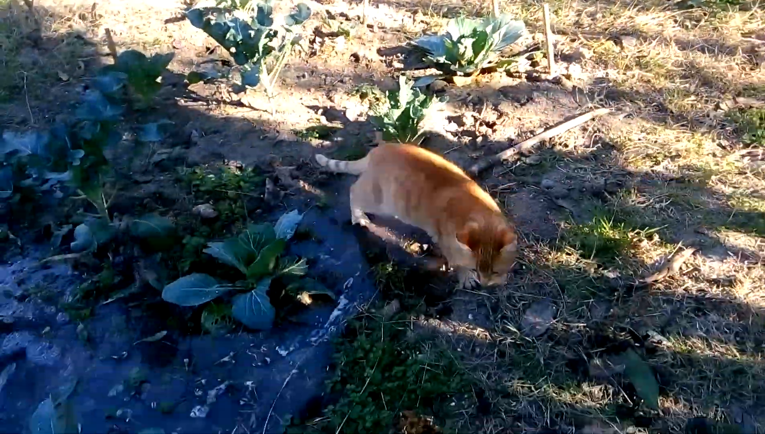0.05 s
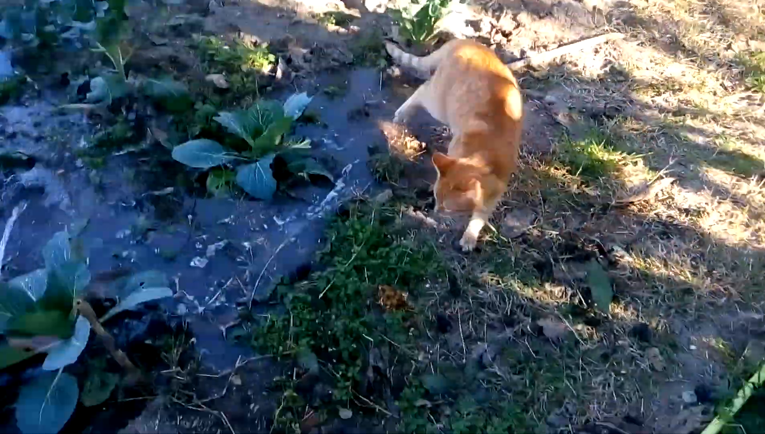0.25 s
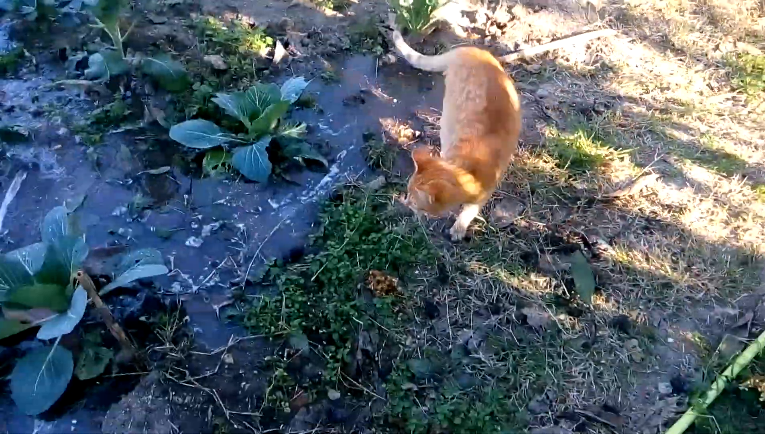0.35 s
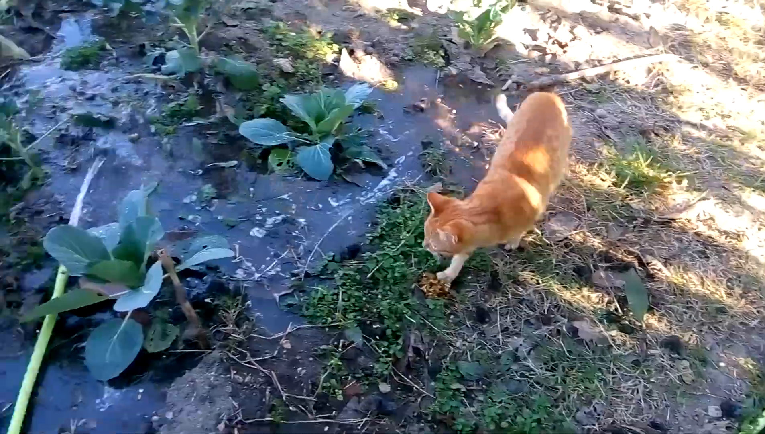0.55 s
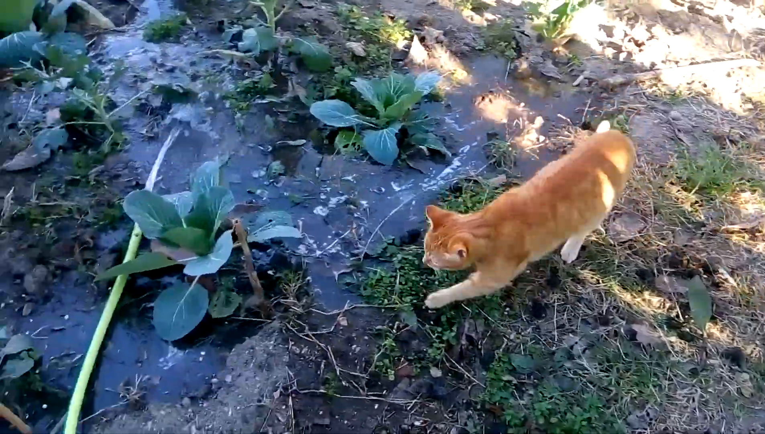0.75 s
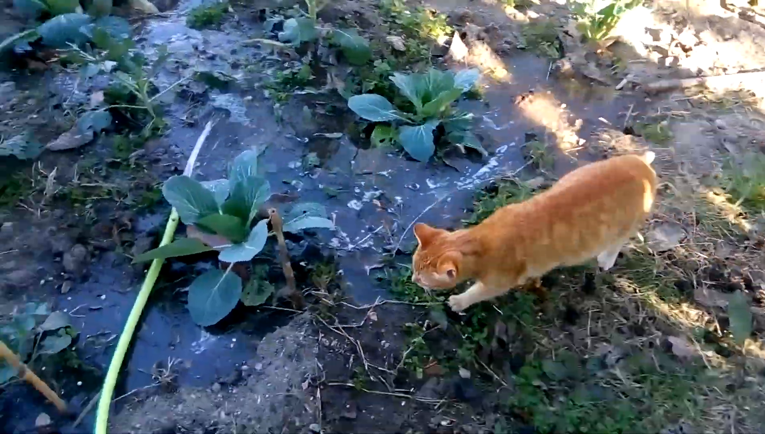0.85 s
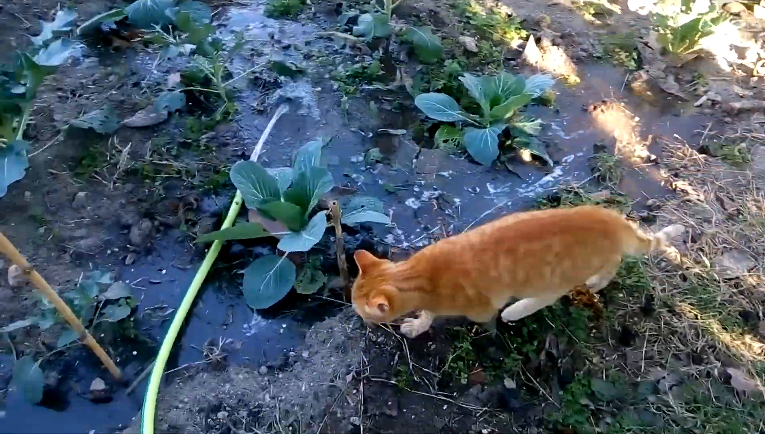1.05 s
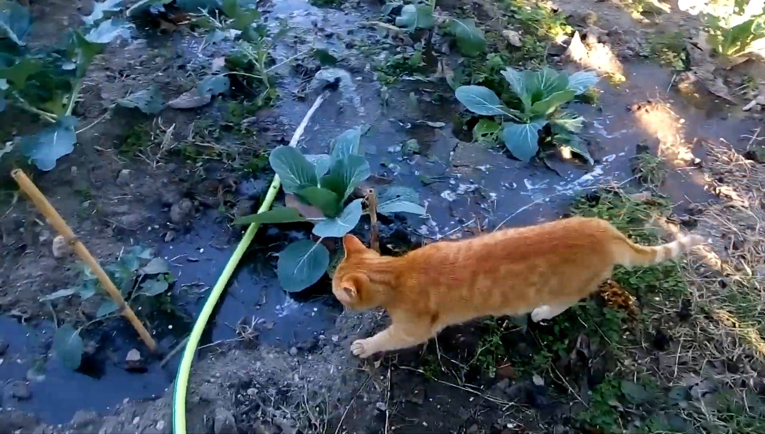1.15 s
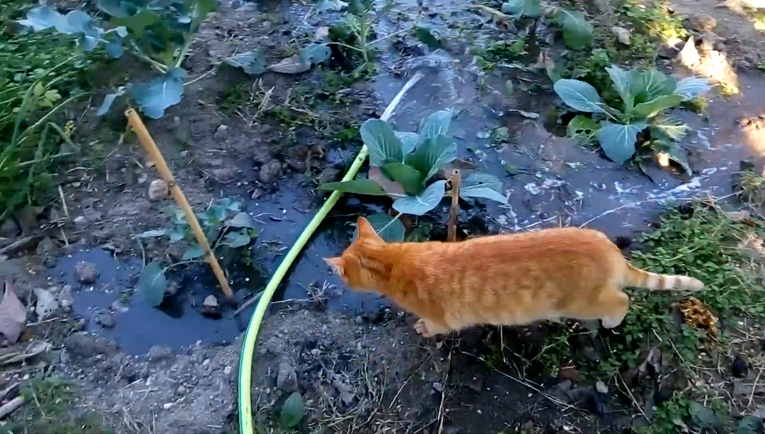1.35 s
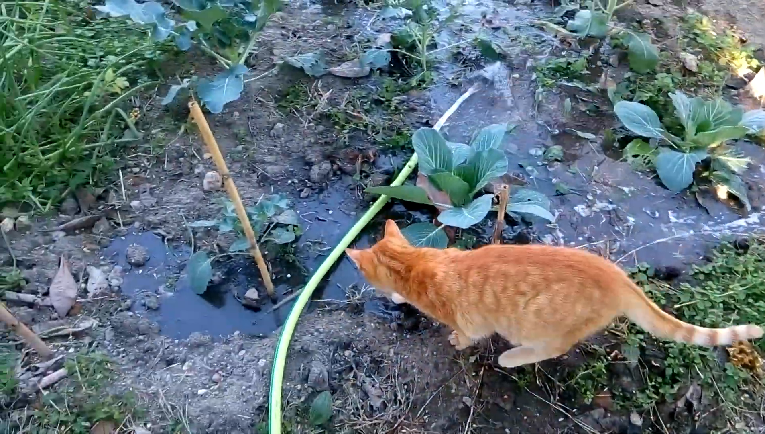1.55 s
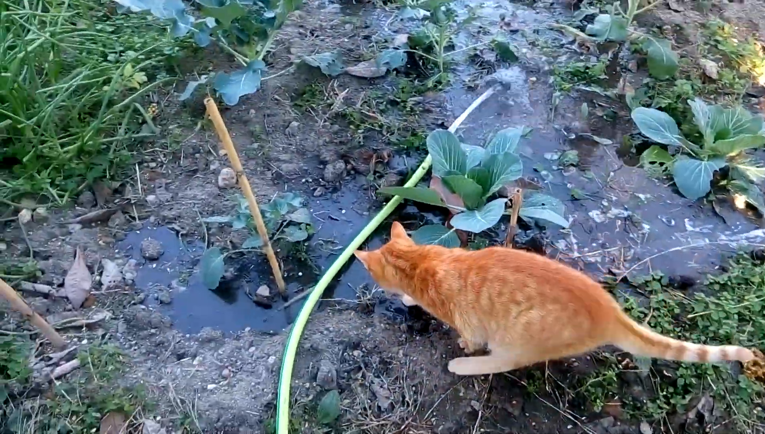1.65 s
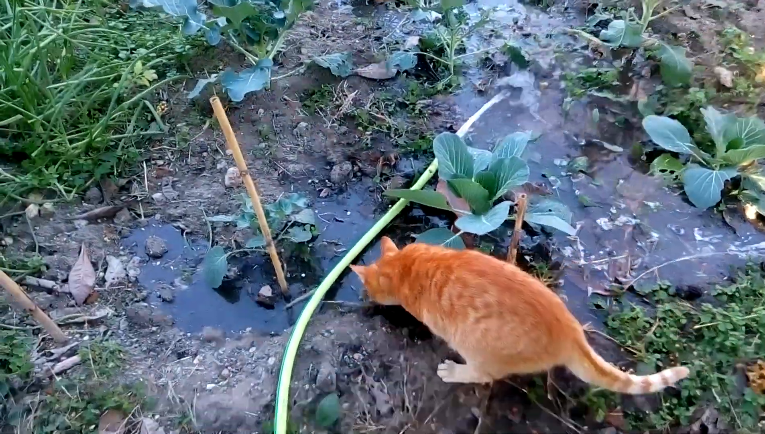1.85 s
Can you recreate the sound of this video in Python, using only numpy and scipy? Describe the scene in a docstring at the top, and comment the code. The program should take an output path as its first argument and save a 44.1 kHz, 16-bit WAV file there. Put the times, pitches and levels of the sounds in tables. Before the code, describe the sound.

Microphone handling knocks and scratchy rubbing, then soft wind gusts over faint running water.

```python
"""A watered garden bed, heard through the two microphone ports of a hand-held camera.
Running water hisses steadily, with two lone drops. A faint whistle rises and twigs tap underfoot.
Up front, fingers shift on the case: skin snaps at the left port, hollow knocks ring the half-covered
right one, and a crackling stick-slip rub dies away. Then light gusts buffet each port in turn."""
import sys
import numpy as np
from scipy import signal
from scipy.fft import rfft, irfft
from scipy.io import wavfile
from scipy.ndimage import uniform_filter1d

SR = 44100
rng = np.random.default_rng(int(sys.argv[2]) if len(sys.argv) > 2 else 0)


def put_to_file(sound):
    """Save the sound as 16-bit audio at rate SR, in the file named by the first command-line argument."""
    columns = np.atleast_2d(sound).T  # one column per channel
    safe = np.clip(columns, -1, 1)
    whole_steps = np.round(safe * 32767)
    wavfile.write(sys.argv[1], SR, whole_steps.astype(np.int16))


N = 83790
TIME_S = np.arange(N) / SR


def undb(db):
    """Decibels to gain."""
    return 10 ** (np.asarray(db) / 20)


def unit(x):
    """Scale to rms 1."""
    return x / np.sqrt(np.mean(x ** 2))


def decay(age_s, t60_s):
    """Exponential fade that falls 60 dB in t60_s."""
    return np.exp(-np.log(1000) * age_s / t60_s)


def colour(x, *curves, size=4096):
    """Minimum-phase EQ through (freq_hz, gain_db) points; several curves stack."""
    half = size // 2
    log_hz = np.log(np.maximum(np.arange(half + 1) * SR / size, 1))
    db = sum(np.interp(log_hz, np.log(hz), gain_db) for hz, gain_db in map(np.transpose, curves))
    cepstrum = irfft(np.log(undb(db)))
    cepstrum[1:half] *= 2
    cepstrum[half + 1:] = 0
    impulse_response = irfft(np.exp(rfft(cepstrum)))
    return signal.oaconvolve(x, impulse_response)[:len(x)]


def wander(per_s):
    """Smooth random drift, rms 1."""
    hold = int(SR / per_s)
    steps = np.repeat(rng.standard_normal(N // hold + 1), hold)
    return unit(uniform_filter1d(steps, hold)[:N])


def flicker(x, depth_db, per_s):
    """Each treble octave wavers in level on its own; the lows waver as one band."""
    spectrum = rfft(x)
    octave = np.round(np.log2(np.maximum(np.arange(len(spectrum)) * SR / N, 1000)))
    return sum(irfft(spectrum * (octave == k), N) * undb(depth_db * wander(per_s))
               for k in np.unique(octave))


def grains(per_s, spread_db):
    """A crackle of random impulses of uneven size, rms 1."""
    hit = rng.random(N) < per_s / SR
    size = undb(spread_db * np.minimum(rng.exponential(size=N), 4))
    return unit(hit * size * rng.choice([-1, 1], N))


def rings(rows):
    """Damped vibrations that leave no net pressure: start_s, peak_db, pitch_hz, t60_s."""
    out = np.zeros(N)
    for start, db, hz, t60 in rows:
        age = np.arange(int(2 * t60 * SR) + 2) / SR
        phase = 2 * np.pi * hz * age
        wave = np.sin(phase) * decay(age, t60) * (1 - np.exp(-phase))
        push = np.diff(wave, prepend=0)
        first = int(start * SR)
        out[first:first + len(age)] += (undb(db) * push / np.abs(push).max())[:N - first]
    return out


# The tone of each port, on the water, the rub and the handling tail: freq_hz, gain_db
LEFT_PORT_EQ = [(1100, 4), (1500, 2.5), (2700, 2), (4500, -4.5), (7500, -2), (10000, 0.8), (12500, 3),
                (14000, -7.5), (15500, -42)]
RIGHT_PORT_EQ = [(1100, 4.5), (1600, 3.1), (2450, 4), (3200, -13), (3700, -14), (4500, -5.5), (6500, -8),
                 (7800, -10.5), (9200, -8.5), (13000, -15), (15500, -17)]
PORT_EQS = (LEFT_PORT_EQ, RIGHT_PORT_EQ)
# Thin, bright water hiss: freq_hz, gain_db
WATER_EQ = [(30, -10), (120, -22), (250, -13), (600, -17.5), (850, -5.5), (1200, -1.5), (4000, 1.5),
            (10000, 1.5), (16000, 3)]
# The hiss swells and dips as the camera moves: time_s, gain_db
WATER_SWELL = [(0, 0.5), (.15, 2), (.45, 0.5), (.8, 1.5), (.92, -1), (1.2, -2), (1.5, 0), (1.6, 0),
               (1.75, 0), (1.9, 0.5)]


def water():
    """Running water lays a bed of hiss and fine spray that flickers a little."""
    swell_db = np.interp(TIME_S, *np.transpose(WATER_SWELL))
    out = []
    for base_db, port_eq in zip((-50, -54.5), PORT_EQS):
        spray = rng.standard_normal(N) + undb(-3.5) * grains(per_s=650, spread_db=4)
        level_db = base_db + swell_db + 0.3 * wander(per_s=30.36)
        hiss = flicker(colour(spray, WATER_EQ, port_eq), depth_db=1.44, per_s=46)
        out.append(undb(level_db) * unit(hiss))
    return np.array(out)


# Lone drops, dead centre: start_s, level_db, pitch_hz
DROPS = [(1.2780, -45, 4620), (1.329, -35, 14000)]


def drops(t60_s=0.004):
    """Single drops tick thinly out of the spray."""
    return rings((s, db, hz, t60_s) for s, db, hz in DROPS)


def whistle(start_s=0.094, length_s=0.054, from_hz=1500, to_hz=1610):
    """One faint, short, rising note, a little to the left."""
    progress = np.clip((TIME_S - start_s) / length_s, 0, 1)
    pitch_hz = from_hz + (to_hz - from_hz) * progress
    note = np.sin(np.pi * progress) * np.sin(2 * np.pi * np.cumsum(pitch_hz) / SR)
    return note * undb([[-47], [-50]])


# Twigs underfoot: start_s, level_db, pitch_hz
TWIG_TAPS = [(.1420, -17, 2270), (.1510, -20, 1840), (.1590, -23.5, 1560), (0.168, -27.5, 2410)]
# Their softened top end: freq_hz, gain_db
TWIG_EQ = [(500, -4), (1100, -4), (1600, -1.5), (3100, -3), (4200, -5), (9000, -10)]


def twigs(t60_s=0.0045):
    """Trodden twigs give a few dry taps, far to the right."""
    taps = rings((s, db, hz, t60_s) for s, db, hz in TWIG_TAPS)
    return colour(taps, TWIG_EQ) * undb([[-28], [0]])


# Gust envelope at each port: time_s, level_db
LEFT_GUSTS = [(0, -84), (0.16, -82), (0.231, -45), (0.41, -58), (0.449, -35), (0.5, -55), (0.62, -60),
              (0.74, -45), (0.8, -51.5), (0.9, -68), (0.95, -53), (1.05, -55.5), (1.1, -41), (1.14, -43),
              (1.189, -40), (1.3, -51), (1.42, -40.5), (1.5, -50.5), (1.56, -45.5), (1.63, -38.5),
              (1.66, -48), (1.7, -42.5), (1.74, -59), (1.78, -47.5), (1.87, -72)]
RIGHT_GUSTS = [(0, -76), (.05, -56.5), (0.1, -82), (0.15, -54), (0.43, -57), (0.535, -42.5), (0.6, -52.5),
               (0.67, -54), (0.715, -44), (0.8, -51), (0.866, -59), (0.896, -27.5), (0.926, -42.5),
               (0.943, -31.5), (0.986, -32), (1.009, -45.5), (1.08, -37.5), (1.19, -42.5), (1.28, -52.5),
               (1.365, -34), (1.41, -44), (1.45, -38), (1.5, -52), (1.62, -61), (1.78, -54.5), (1.89, -54)]
# Low rumble of the eddies: freq_hz, gain_db
EDDY_EQ = [(20, -13), (45, -14.5), (75, -15.5), (130, -1.5), (220, 2.5), (380, -1.5), (600, -8), (900, -16),
           (1400, -29.5), (2500, -32), (5000, -76)]
# Single strong buffets: start_s, level_db, pitch_hz, port (0 left, 1 right)
BUFFETS = [(.8927, -23, 385, 1), (.9055, -27.5, 453, 1), (0.937, -25.5, 144, 1), (0.9443, -33, 284, 1),
           (.9540, -33, 260, 1), (.9880, -27, 1130, 1), (1.1020, -29.5, 540, 0), (1.1820, -31.5, 590, 1),
           (1.1910, -29.5, 510, 0), (1.365, -30, 214, 1), (1.3760, -31, 440, 1), (1.4210, -32.5, 610, 0),
           (1.6200, -33, 263, 0)]
# Buffets are soft, with little treble: freq_hz, gain_db
BUFFET_EQ = [(800, 0.5), (1500, -4.5), (2400, 2), (3500, -26), (8000, -24)]


def wind(buffet_cycles=6.2):
    """Eddies thump each port as strongly as the gust there; a few soft buffets stand out."""
    out = []
    for side, (gusts, trim_db) in enumerate([(LEFT_GUSTS, -0.5), (RIGHT_GUSTS, 1.5)]):
        eddies = unit(colour(grains(per_s=1400, spread_db=1.87), EDDY_EQ))
        gust_db = trim_db + np.interp(TIME_S, *np.transpose(gusts))
        buffets = rings((s, db, hz, buffet_cycles / hz) for s, db, hz, port in BUFFETS if port == side)
        out.append(eddies * undb(gust_db) + colour(buffets, BUFFET_EQ))
    return np.array(out)


# Finger strokes on the case: start_s, attack_s, t60_s, left_db, right_db
RUBS = [(0.141, 0.018, 0.16, -49, -40.5), (0.221, 0.0069, 0.96, -37.5, -46.5),
        (0.345, 0.047, 0.14, -42.5, -49), (0.43, 0.0046, 0.27, -38, -47),
        (0.531, 0.014, 0.091, -40.5, -42.5), (0.615, 0.02, 0.14, -44.5, -44),
        (0.689, 0.0074, 0.13, -57, -47.5), (0.820, 0.0043, .07, -36.5, -47),
        (0.832, 0.0061, 0.066, -39, -46), (1.142, .008, .06, -47, -52), (1.18, 0.021, 0.11, -49.5, -51),
        (1.363, .012, 0.082, -50.5, -47), (1.58, 0.012, 0.086, -55, -55), (1.685, 0.016, 0.14, -63, -53.5)]
# Scratchy tone of the rub: freq_hz, gain_db
RUB_EQ = [(200, -14), (500, 1), (800, 4.5), (1500, 1), (3000, 2), (5000, 4.5), (8000, -1.5), (12000, -3.5),
          (16000, -5)]


def rubbing():
    """Skin sticks and slips in dense grains that swell and fade with each stroke."""
    out = []
    for side, port_eq in enumerate(PORT_EQS):
        envelope = np.zeros(N)
        for start, attack, t60, *levels_db in RUBS:
            rise = np.clip((TIME_S - start) / attack, 0, 1)
            fall = decay(np.maximum(TIME_S - start - attack, 0), t60)
            envelope += undb(levels_db[side]) * rise * fall
        crackle = colour(grains(per_s=9000, spread_db=2), RUB_EQ, port_eq)
        out.append(envelope * unit(crackle))
    return np.array(out)


# Hollow knocks: start_s, level_db, cavity_hz, t60_s, overtone_offset_db, thud_offset_db
KNOCKS = [(.2120, -32.5, 845, 0.01, 1, -45), (.2302, -19, 780, 0.0099, -6, -43),
          (0.2332, -18, 630, 0.0067, 1, -45), (0.2399, -4, 1510, 0.0011, 6.5, -39),
          (0.2713, -13.5, 1200, 0.0036, -3, -45), (0.3012, -22.5, 970, 0.0029, -3, -40),
          (0.3218, -7.5, 780, 0.0078, 1.5, -29.5), (0.3511, -9, 970, 0.004, 5.5, -45)]
# Overtones of the port: pitch_hz, gain_db, t60_s
PORT_MODES = [(1576, -9, 0.0039), (2590, -11, 0.0028), (4930, -13, 0.00061), (10600, -11, 0.00059)]
# Tone of the knocks through the covered port: freq_hz, gain_db
KNOCK_EQ = [(50, -4), (300, -0.5), (500, -3.5), (750, -0.5), (3200, 0), (4200, -1.5), (6000, 3.5),
            (12000, 0)]


def knocks(thud_hz=50, thud_t60_s=0.031):
    """Each knock rings the cavity of the half-covered port and moves the case with a low thud."""
    cavity = rings((s, db, hz, t60) for s, db, hz, t60, _, _ in KNOCKS)
    thuds = rings((s, db + thud_db, thud_hz, thud_t60_s) for s, db, *_, thud_db in KNOCKS)
    overtones = rings((s, db + overtone_db + mode_db, hz, t60)
                      for s, db, _, _, overtone_db, _ in KNOCKS for hz, mode_db, t60 in PORT_MODES)
    return colour(cavity + thuds + overtones, KNOCK_EQ)


# Sharp skin snaps: start_s, body_db, body_hz, tick_db
SNAPS = [(0.2114, -46, 3000, -17), (0.2236, -12.5, 5530, -22.5), (0.2272, -10, 5540, -19),
         (0.2394, -11, 1760, 1.5), (.2716, -23, 2210, -38), (0.2738, -5.5, 3340, -14.5),
         (.3010, -16.5, 4240, -16), (0.3197, -16.5, 644, -47), (.3210, -8.5, 3350, -12),
         (.3509, -10, 2110, -18), (.3754, -6, 3420, -10.5), (0.3794, -6, 3320, -15),
         (.4369, -6.5, 2060, -40), (0.44, -14.5, 1010, -31), (0.4442, -22, 890, -34),
         (.4630, -37, 2500, -23.5), (0.476, -22.5, 1160, -38), (0.5439, -18.5, 940, -23),
         (.7120, -26.5, 4500, -43)]


def snaps(body_cycles=1.14, tick_hz=10100, tick_t60_s=0.00052):
    """Skin slips at the port: a body that dies in about one cycle, topped by a bright tick."""
    bodies = rings((s, db, hz, body_cycles / hz) for s, db, hz, _ in SNAPS)
    ticks = rings((s, db, tick_hz, tick_t60_s) for s, _, _, db in SNAPS)
    return bodies + ticks


# The highest treble falls away on snaps and knocks: freq_hz, gain_db
TREBLE_ROLL_OFF = [(100, 2.5), (13200, 1), (16000, -13)]


def handling(tail_t60_s=0.025):
    """Snaps left, knocks right, with a faint tail scattered back by the ground and plants."""
    left, right = snaps(), knocks()
    tail_send = left + undb(-5) * right
    fade = decay(np.arange(SR // 2) / SR, tail_t60_s)
    out = []
    for direct, return_db, port_eq in zip((left, right), (-15.5, -51), PORT_EQS):
        scatter = colour(rng.standard_normal(len(fade)), port_eq) * fade
        tail = signal.fftconvolve(tail_send, scatter / np.linalg.norm(scatter))[:N]
        out.append(colour(direct, TREBLE_ROLL_OFF) + undb(return_db) * tail)
    return np.array(out)


def scene():
    """The stereo mix at the two ports: close finger noise over the garden."""
    return handling() + rubbing() + twigs() + water() + drops() + wind() + whistle()


def record(dry):
    """The camera clips at full scale, then cuts the top end steeply."""
    low_pass = signal.ellip(8, 0.2, 70, 16000, fs=SR, output="sos")
    return signal.sosfilt(low_pass, np.clip(dry, -1, 1))


dry = scene()
out = record(dry)
put_to_file(out)
```